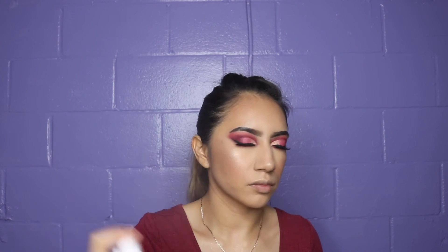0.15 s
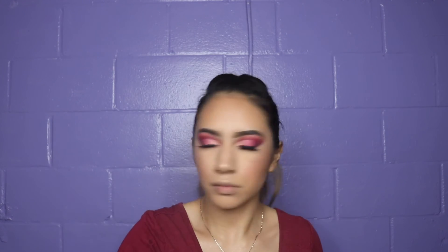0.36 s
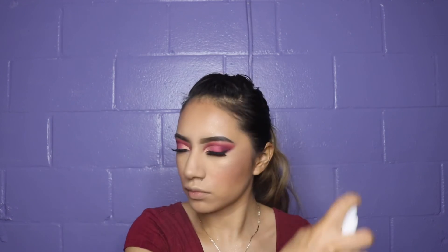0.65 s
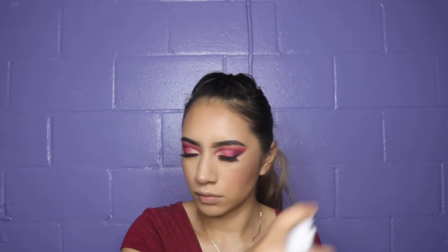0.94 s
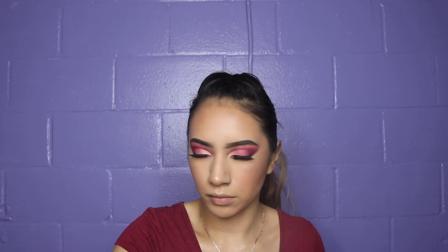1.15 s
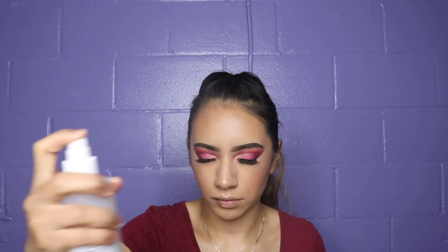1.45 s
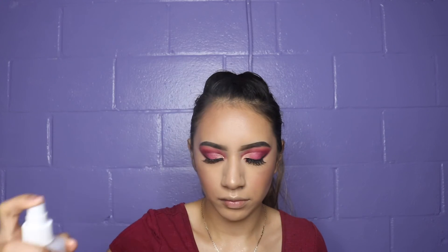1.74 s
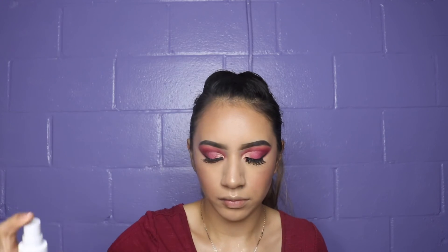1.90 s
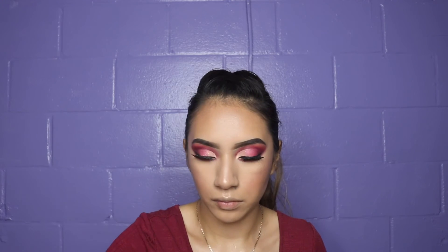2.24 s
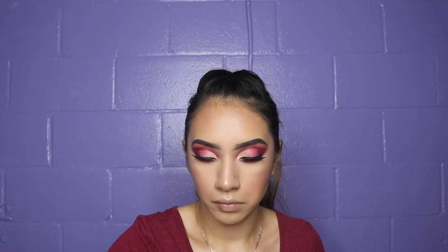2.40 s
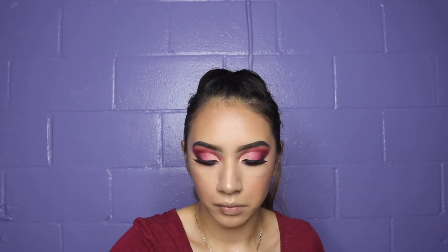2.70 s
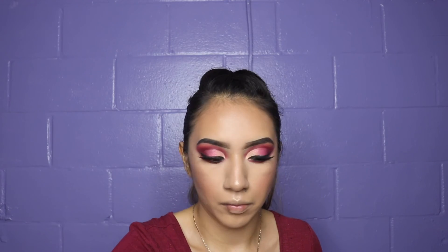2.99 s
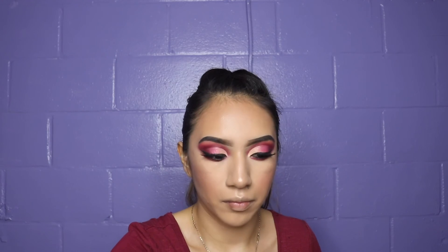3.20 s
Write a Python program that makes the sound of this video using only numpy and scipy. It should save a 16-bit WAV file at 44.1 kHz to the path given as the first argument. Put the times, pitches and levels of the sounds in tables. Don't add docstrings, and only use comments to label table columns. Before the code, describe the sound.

Quick pump-bottle spritzes with plastic clicks and short mist hisses, ending in one hard knock.

```python
import sys
import numpy as np
from scipy import signal
from scipy.fft import rfft, irfft
from scipy.io import wavfile
from scipy.ndimage import uniform_filter1d, map_coordinates

SR = 44100
rng = np.random.default_rng(int(sys.argv[2]) if len(sys.argv) > 2 else 0)


def boost_factor(decibels):
    exponent = np.asarray(decibels, float) / 20
    return 10 ** exponent


def generate_wav(signal):
    frames = np.transpose(np.atleast_2d(signal))
    scaled = np.clip(frames, -1, 1) * 32767
    pcm = np.round(scaled).astype(np.int16)
    wavfile.write(sys.argv[1], SR, pcm)


N = 147735

# start_s, length_s, level_db, throat_hz, brightness_db_per_octave
MIST_PUFFS = [
    (-.02, 0.044, -41.5, 2660, 0.5),
    (0.211, 0.034, -35, 2900, 0.5),
    (.463, 0.031, -36, 3090, -0.5),
    (0.736, 0.029, -38, 2400, 0.5),
    (0.962, 0.033, -35, 3000, 0.9),
    (1.234, 0.022, -36, 2605, -1),
    (1.447, 0.026, -34.5, 2200, -0.2),
    (1.686, 0.033, -35.5, 2200, 0.4),
]
# frequency_hz, density_db_per_hz
MIST_SPECTRUM = [(290, -26), (500, -15.5), (946, -13), (2070, -1), (5090, -5), (5880, -0.5), (6800, -5.5),
                 (12300, -14.5), (16000, -22)]
# pitch_hz (0 = throat pitch), width_hz, level_db
NOZZLE_WHISTLES = [(0, 870, -6), (6070, 1100, -12.5)]
# start_s, peak_db, brightness_db
VALVE_SNAPS = [
    (0.189, -23, -2.5),
    (0.439, -19.5, 4.5),
    (0.711, -18.5, 4),
    (0.933, -22.5, -1),
    (1.184, -21.5, -0.5),
    (1.411, -21.5, -0.5),
    (1.656, -22.5, -1),
]
# pitch_hz, level_db, t60_s
HEAD_SHELL = [(322, -11.5, 0.064), (750, -1, 0.012), (1017, 1.5, 0.0073), (1220, -3, 0.014),
              (1526, 0.5, 0.013), (2200, 7, 0.0059), (2650, -4, 0.0061), (3700, -5, 0.005),
              (4900, -11, 0.0068), (5720, -15.5, 0.0074)]
# start_s, peak_db, bottle_note_hz, stem_db, spring_db
PISTON_TICKS = [(0.072, -27.5, 695, -7, -26), (0.103, -28, 830, -11, -16), (0.139, -26.5, 785, -7, -15),
                (0.323, -29, 700, -13, -26), (0.353, -30.5, 900, -5, -16), (0.38, -24.5, 678, -8.5, -16.5),
                (0.39, -28, 616, -10, -24), (0.574, -30.5, 940, -10.5, -22), (0.605, -30, 455, -5.5, -16),
                (0.629, -25.5, 750, -9, -17), (0.637, -27.5, 797, -3, -25), (0.832, -31.5, 715, -11, -22),
                (0.862, -30.5, 464, -7.5, -20), (0.886, -29, 890, -7, -14), (1.074, -31.5, 700, -4.5, -20),
                (1.109, -24.5, 641, -11, -22.5), (1.135, -24, 681, -8.5, -24),
                (1.217, -35.5, 655, -3.5, -14), (1.297, -35, 625, -10, -27), (1.34, -24.5, 630, -11, -19),
                (1.348, -41, 457, -15.5, -20), (1.363, -24, 613, -7.5, -20), (1.373, -34.5, 596, -6, -5),
                (1.554, -36.5, 720, -6, -27), (1.59, -25.5, 520, -11, -16), (1.617, -29.5, 958, -6, -20),
                (1.803, -34, 700, -11, -20), (1.841, -26, 550, -8, -19), (1.87, -25, 694, -12, -20),
                (1.879, -31.5, 690, -5.5, -19), (1.891, -37, 500, -9, -5.5), (1.902, -50, 519, -17, -24),
                (2.005, -34.5, 825, -15, -30), (2.329, -35, 1100, -14, -13)]
# frequency_hz, density_db_per_hz
STEM_SPECTRUM = [(500, -9), (1000, -3), (1600, -1), (2750, 1.5), (3300, -15.5), (4300, -22), (8000, -39)]
# frequency_hz, density_db_per_hz
SPRING_SPECTRUM = [(3500, -19), (4400, -1), (6200, -1), (7300, -20), (9000, -27)]
# centre_s, half_length_s, level_db, centre_hz
SLEEVE_RUSTLES = [(2.1, 0.0054, -52, 6000), (2.106, 0.005, -48, 2400), (2.225, 0.035, -55, 9300),
                  (2.255, 0.03, -58, 2800), (2.225, .035, -59, 5000), (2.35, 0.018, -56, 2000),
                  (2.48, 0.045, -61, 6800), (.65, 0.018, -54, 4500), (1.222, 0.004, -49, 5000),
                  (1.89, 0.012, -53, 4000), (3.347, .011, -60, 8800), (3.345, .015, -55, 450),
                  (1.795, 0.01, -57, 5800), (1.712, .011, -44, 5800), (1.468, .009, -47, 5900),
                  (1.25, .007, -46, 3300)]
# start_s, level_db, brightness_db
SET_DOWN = [
    (3.1338, -16, 1),
    (3.1435, -23.5, 2),
    (3.206, -43, 2),
]
# pitch_hz, level_db, t60_s
TABLE_MODES = [(162.5, -11, 0.35), (175, -4, 0.33), (189.5, -6.5, 0.29), (279.2, 1, .2), (432.6, -17, 0.29),
               (537, -21, .2), (596, -15, .08), (700, -28, 0.32), (958, -12, 0.28), (1077, -13.5, 0.21),
               (2790, -7, 0.058), (3260, -16, 0.12), (5460, -29, .25), (7700, -28, .3)]
# frequency_hz, density_db_per_hz
CRACK_SPECTRUM = [(300, 4), (900, -6.5), (3000, 2), (6000, -3.5), (9000, -13.5), (15000, -28)]
# frequency_hz, density_db_per_hz
RATTLE_SPECTRUM = [(150, -4), (300, 6), (900, -4.5), (2000, -6), (4000, -15), (8000, -32), (15000, -44)]
# time_s, left_port_late_us, left_minus_right_db
HAND_PATH = [(0, -70, 1.5), (.22, -60, 2), (.46, 20, -1), (.73, 70, -1), (.96, 55, -.5), (1.21, 25, -1),
             (1.44, -60, 3), (1.7, -90, 4.5), (1.9, -60, 2), (2.1, 110, -2.5), (2.6, 110, -2.5),
             (3.0, 50, 1)]
# frequency_hz, level_db
LEFT_PORT_SHADE = [(500, -1.5), (1000, -1), (2000, -4), (4000, -1), (8000, 2.5)]
# delay_s, level_db
EARLY_ECHOES = [(.0023, -11), (.0044, -6.5), (.008, -15.5), (.013, -21)]
# centre_hz, t60_s, level_db
ROOM_TAIL = [(185, 0.68, -15), (456, 0.22, 0.5), (1380, 0.53, -3), (4140, 0.59, -13.5), (10300, 0.23, -5)]
# pitch_hz, level_db_rms
HUM_LINES = [(59.2, -57), (91.5, -65), (118.4, -66), (236.9, -69), (349.9, -56), (409.1, -68), (479.1, -68),
             (586.8, -71), (705.2, -70.5), (818.3, -73.5)]
# frequency_hz, density_db_per_hz
AIR_SPECTRUM = [(30, -9), (55, -10.5), (130, -5), (330, -8), (800, -15.5), (3000, -21.5), (10000, -27.5),
                (16000, -37.5)]

TOUCH_S = 0.001255


def pump():
    out = np.zeros((2, N))
    for start_s, length_s, db, throat_hz, tilt_db in MIST_PUFFS:
        add(out, boost_factor(db) * puff(length_s, throat_hz, tilt_db), start_s)
    for start_s, db, tilt_db in VALVE_SNAPS:
        add(out, boost_factor(db + 4.5) * snap(tilt_db), start_s + TOUCH_S)
        forerunner_lead_s, forerunner_db = 0.0095, -10
        forerunner = boost_factor(db + forerunner_db) * tick(682, -9.5, -20)
        add(out, forerunner, start_s + TOUCH_S - forerunner_lead_s)
    for start_s, db, note_hz, stem_db, spring_db in PISTON_TICKS:
        add(out, -boost_factor(db - 3.5) * tick(note_hz, stem_db, spring_db), start_s + TOUCH_S)
    return out


def puff(length_s, throat_hz, tilt_db):
    rise_share, fall_s, whistle_fall_s = 0.51, 0.0023, 0.0038
    drizzle_db, drizzle_s = -5.5, 0.023
    size = int(0.2 * SR)
    t = np.arange(size) / SR
    late = np.maximum(t - length_s, 0)
    swell = np.sin(np.pi / 2 * np.clip(t / (rise_share * length_s), 0, 1)) ** 2
    envelope = swell * (np.exp(-late / fall_s) + boost_factor(drizzle_db) * np.exp(-late / drizzle_s))

    hiss = colour(rng.standard_normal(size), MIST_SPECTRUM)
    jet = unit(colour(hiss, [(1000, -2 * tilt_db), (16000, 2 * tilt_db)]))
    for hz, width_hz, db in NOZZLE_WHISTLES:
        slide_hz = (hz or throat_hz) * (1 + 0.12 * walk(27.8, size) / 2)
        whistle = walk(width_hz, size) * np.sin(2 * np.pi * np.cumsum(slide_hz) / SR)
        jet = jet + boost_factor(db) * np.exp(-late / whistle_fall_s) * whistle
    drops = (rng.random(size) < 0.02) * rng.standard_normal(size) ** 3
    jet = jet + boost_factor(-16) * unit(colour(drops, MIST_SPECTRUM))
    sputter = boost_factor(1.5 * walk(160, size))
    return unit(jet) * envelope * sputter


def snap(tilt_db):
    snap_t60_s = 0.0019
    valve = ring([(1890, 0, snap_t60_s), (4400, -14.5 + 2 * tilt_db, snap_t60_s)], 0.04, 0.61)
    return valve + boost_factor(-5) * ring(HEAD_SHELL, 0.04, 1.3, tilt_db)


def tick(note_hz, stem_db, spring_db):
    modes = [(note_hz, 0, 0.016), (note_hz * 0.56, -9, 0.02), (note_hz * 1.54, -5, 0.008)]
    note = uniform_filter1d(ring(modes, 0.04, 4.3, detune=0), size=15)
    stem = boost_factor(8 + stem_db) * scrape(STEM_SPECTRUM)
    spring = boost_factor(7.5 + spring_db) * scrape(SPRING_SPECTRUM)
    return note + stem + spring


def scrape(points):
    rise_s, fall_s = 0.00067, 0.0028
    t = np.arange(int(0.04 * SR)) / SR
    rise = (t / rise_s) ** 2 / (1 + (t / rise_s) ** 2)
    y = colour(rng.standard_normal(len(t)), points) * rise * np.exp(-t / fall_s)
    return y / np.abs(y).max()


def knock():
    crack_db, crack_s, rattle_db, rattle_s = -5.5, 0.0035, -16.5, 0.045
    out = np.zeros((2, N))
    t = np.arange(int(0.4 * SR)) / SR
    for start_s, db, tilt_db in SET_DOWN:
        crack = unit(colour(rng.standard_normal(len(t)), CRACK_SPECTRUM))
        crack = boost_factor(crack_db) * np.exp(-t / crack_s) * crack
        rattle = unit(colour(rng.standard_normal(len(t)), RATTLE_SPECTRUM))
        rattle = boost_factor(rattle_db) * np.exp(-t / rattle_s) * rattle
        table = ring(TABLE_MODES, 0.4, 0.55, tilt_db, detune=0)
        add(out, boost_factor(db) * (crack + rattle + table), start_s)
    return signal.sosfilt(signal.butter(3, 140, "high", fs=SR, output="sos"), out)


def sleeve():
    out = np.zeros((2, N))
    t = np.arange(int(0.3 * SR)) / SR - 0.15
    for centre_s, half_s, db, hz in SLEEVE_RUSTLES:
        grain = rng.standard_normal(len(t)) * boost_factor(2.2 * walk(140, len(t)))
        swish = unit(band(band(grain, hz, hz * 0.67), hz, hz * 1.03))
        bump = np.exp(-0.5 * (t / half_s) ** 2)
        add(out, boost_factor(db) * swish * bump, centre_s - 0.15)
    return out


def background():
    t = np.arange(N) / SR
    hum = 0
    for hz, db in HUM_LINES:
        level = boost_factor(db + 2.5 + 1.25 * walk(26.0, N))
        cycles = hz * t + rng.random() + 0.049 * walk(1.7, N)
        hum = hum + level * np.sin(2 * np.pi * cycles)
    mid, side = colour(rng.standard_normal((2, N)), AIR_SPECTRUM)
    wide = colour(side, [(60, -8), (780, -7), (4000, 0), (15000, -1.5)])
    air = (mid + np.array([wide, -wide])) / np.std(mid)
    return hum + boost_factor(-54) * air


def room(echo_db):
    t = np.arange(int(0.6 * SR)) / SR
    shared, own = rng.standard_normal(len(t)), rng.standard_normal((2, len(t)))
    h = np.zeros((2, len(t)))
    for hz, t60_s, db in ROOM_TAIL:
        noise = shared + min(hz / 600, 6.5) * own
        fade = np.exp(-np.log(1000) * t / t60_s) * np.clip(t / 0.0041, 0, 1)
        tail = band(noise, hz, hz) * fade
        h = h + boost_factor(db) * tail / np.sqrt(np.sum(tail[0] ** 2) * SR / 2 / hz)
    h[:, 0] += 1
    for k, (delay_s, db) in enumerate(EARLY_ECHOES):
        h[k % 2, int(delay_s * SR)] += boost_factor(db + echo_db)
        h[1 - k % 2, int(delay_s * SR * 1.04)] += boost_factor(db + echo_db - 2.5)
    return h


def add(out, x, at_s):
    time_s, lags_us, pans_db = np.array(HAND_PATH).T
    lag_us = np.interp(at_s, time_s, lags_us)
    pan_db = np.interp(at_s, time_s, pans_db)
    for ch, side in enumerate((1, -1)):
        at = (at_s + side * lag_us / 2 / 10 ** 6) * SR
        i = np.arange(max(int(at), 0), min(int(at) + len(x), N))
        out[ch, i] += boost_factor(side * pan_db / 2) * map_coordinates(x, [i - at])


def ring(modes, length_s, spread_db, tilt_db=0., detune=0.034):
    contact_ms = 0.31
    t = np.arange(int(length_s * SR)) / SR
    hz, db, t60_s = np.array(modes).T
    vary_db, vary_hz = rng.standard_normal((len(hz), 2)).T
    gain = boost_factor(db + spread_db * vary_db + tilt_db * np.log2(hz / 1500))
    tones = np.sin(2 * np.pi * np.outer(hz * (1 + detune * vary_hz), t))
    y = gain @ (tones * np.exp(-np.log(1000) * np.outer(1 / t60_s, t)))
    y = y * (1 - np.exp(-(t * 1000 / contact_ms) ** 2))
    return y / np.abs(y).max()


def unit(x):
    return x / np.sqrt(np.mean(x ** 2))


def colour(x, points):
    hz = np.fft.rfftfreq(x.shape[-1], 1 / SR) + 1
    point_hz, point_db = np.array(points).T
    gain = boost_factor(np.interp(np.log(hz), np.log(point_hz), point_db))
    return irfft(rfft(x) * gain, x.shape[-1])


def band(x, hz, width_hz):
    return signal.lfilter(*signal.iirpeak(min(hz, SR / 2.2), hz / width_hz, fs=SR), x)


def walk(rate_hz, size):
    k = max(int(SR / rate_hz), 1)
    return unit(uniform_filter1d(uniform_filter1d(rng.standard_normal(size), k), k))


def through(x, response):
    return signal.fftconvolve(x, response, axes=1)[:, :N]


def scene():
    near, far = room(0), room(-32)
    hand = signal.sosfilt(signal.butter(2, 270, "high", fs=SR, output="sos"), pump() + sleeve())
    hand = np.array([colour(hand[0], LEFT_PORT_SHADE), hand[1]])
    return through(hand, near) + through(knock(), far) + background()


def band_limit(x):
    return signal.sosfilt(signal.butter(12, 16600, fs=SR, output="sos"), x)


def record(dry):
    top_cut = signal.ellip(10, 0.3, 60, 15850, fs=SR, output="sos")
    rumble_cut = signal.butter(3, 42, "high", fs=SR, output="sos")
    mix = signal.sosfilt(np.vstack([top_cut, rumble_cut]), dry)
    return band_limit(mix)


dry = scene()
out = record(dry)
generate_wav(out)
```